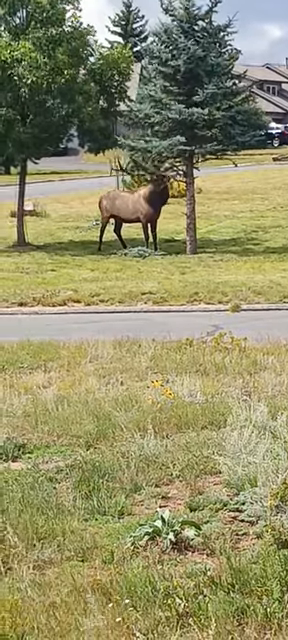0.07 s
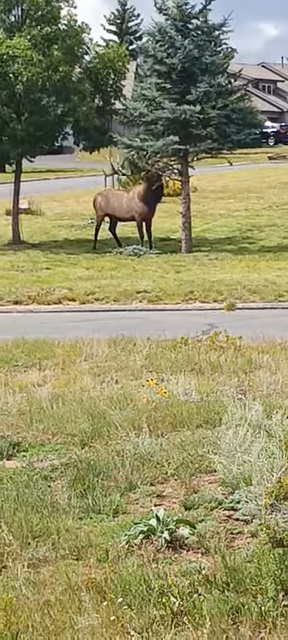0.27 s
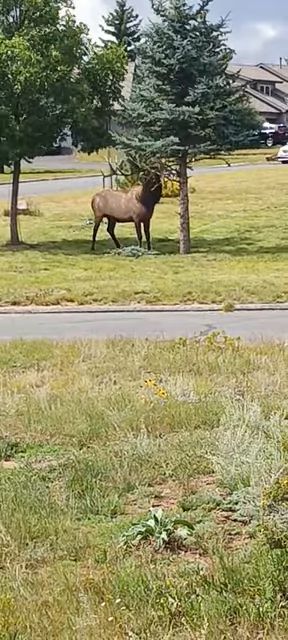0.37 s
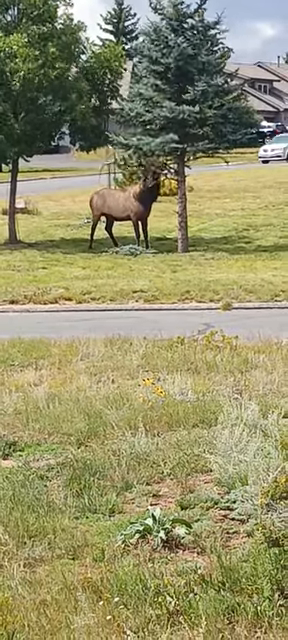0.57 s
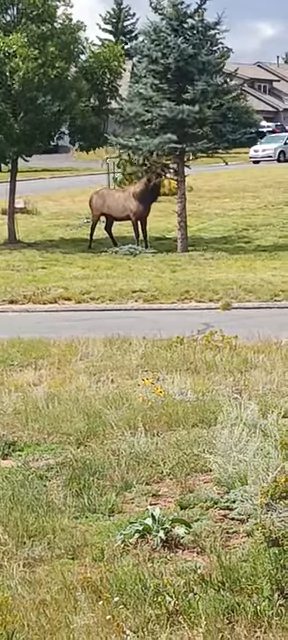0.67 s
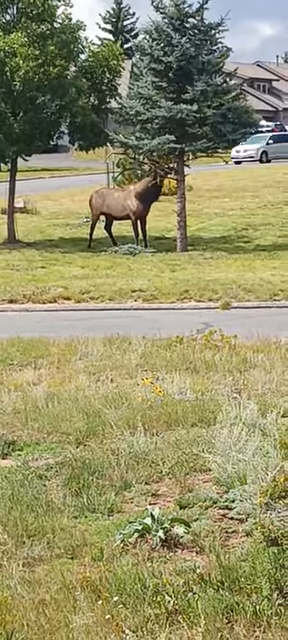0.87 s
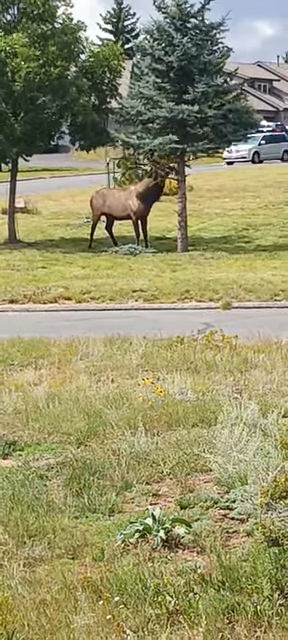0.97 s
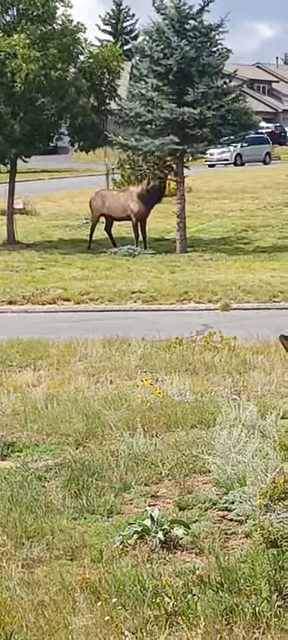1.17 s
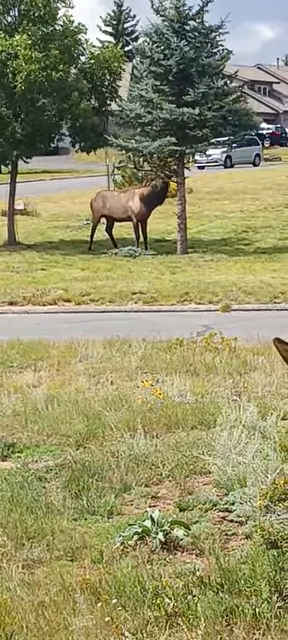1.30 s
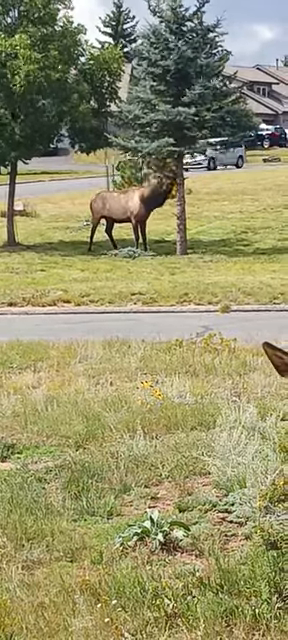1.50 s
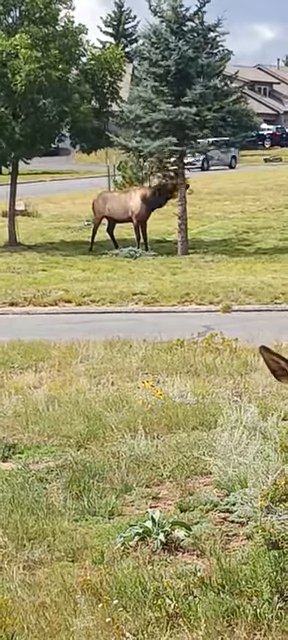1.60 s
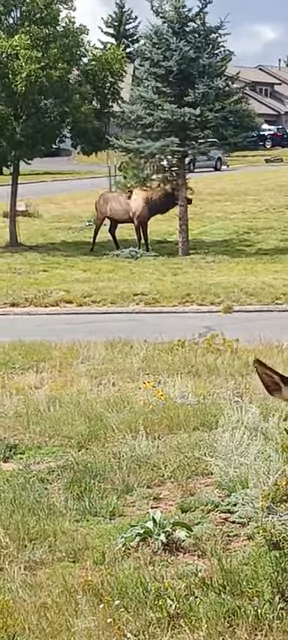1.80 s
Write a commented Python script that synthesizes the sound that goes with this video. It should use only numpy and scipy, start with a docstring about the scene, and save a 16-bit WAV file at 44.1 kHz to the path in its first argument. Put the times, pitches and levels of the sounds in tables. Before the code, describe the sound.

A songbird whistles thin high glides, then buzzes, trills and chatters outdoors over faint traffic rumble.

```python
"""A whistle sliding down from about 2.6 kHz comes first, soon joined by thin, high gliding whistles: a
songbird, probably a starling, left of the microphones. It sings near a road across an open lawn. Its two
voices, near sines on drawn pitch curves, slide through high and low whistles, break into a buzz and a trill,
and end in loose chatter. A ground bounce and noise-built echoes from trees and houses surround it; a fainter
song sounds farther off. Below lies shaped noise: the low rumble of distant traffic and a faint hiss."""
import sys
import numpy as np
from scipy import signal
from scipy.fft import rfft, irfft
from scipy.io import wavfile
from scipy.ndimage import uniform_filter1d, map_coordinates

SR = 44100
rng = np.random.default_rng(int(sys.argv[2]) if len(sys.argv) > 2 else 0)


def persist_wave(psi):
    """Save psi, clipped to +-1, as 16-bit WAV."""
    counts = np.round(np.clip(psi, -1, 1) * 32767).astype(np.int16)
    wavfile.write(sys.argv[1], SR, np.atleast_2d(counts).T)


N = 81585  # length in samples


def amp(db):
    """Amplitude factor of a level in dB."""
    return 10 ** (np.asarray(db) / 20)


def evened(x):
    """Scales a sound to an rms of one."""
    return x / np.sqrt(np.mean(x ** 2) + 1e-20)


def read(points, hz):
    """Reads a spectrum on a log-frequency axis."""
    f, value = np.transpose(points)
    return np.interp(np.log(hz + 1), np.log(f + 1), value)


def clock():
    """Time of every sample in seconds."""
    return np.arange(N) / SR


def drift(rate_hz):
    """Smooth chance movement, mostly slower than a rate."""
    hz = np.fft.rfftfreq(N, 1 / SR)
    spectrum = rfft(rng.standard_normal(N))
    return evened(irfft(spectrum / (1 + (hz / rate_hz) ** 4), N))


ATTACK_S, RELEASE_S = 0.0013, 0.002
WHISTLE_JITTER, CHIRP_JITTER = 0.0025, 0.011  # unsteadiness as a share of the pitch, doubled or halved in places


def voice(curve, jitter, bend_hz=0, overtone_db=-42, flutter_db=1):
    """One side of the syrinx: a near sine on a curve of pitch and level, slightly unsteady."""
    t = clock()
    s, hz, db = np.transpose(curve)
    attack = np.clip((t - s[0]) / ATTACK_S, 0, 1)
    release = np.clip((s[-1] - t) / RELEASE_S, 0, 1)
    pitch_hz = (np.interp(t, s, hz) + bend_hz) * (1 + jitter * drift(409))
    phase = 2 * np.pi * np.cumsum(pitch_hz) / SR
    level = attack * release * amp(np.interp(t, s, db) + flutter_db * drift(150))
    tone = np.sin(phase) + amp(overtone_db) * np.sin(2 * phase)
    return np.sqrt(2) * level * tone


# gliding whistles, one curve each: time_s, pitch_hz, level_db
LEAD_IN = [(0.01, 8870, -87), (0.04, 9000, -67.5), (0.076, 8760, -60), (0.116, 8180, -55.5),
           (0.15, 7940, -57.5), (0.19, 7500, -60)]
HIGH_WHISTLE = [(0.195, 8480, -69), (0.242, 8810, -51), (0.29, 8835, -45), (0.326, 8680, -41),
                (0.38, 8600, -43), (0.43, 8450, -41.5), (0.48, 8350, -43), (0.575, 8338, -39),
                (0.587, 8330, -56)]
SECOND_WHISTLE = [(0.19, 7800, -62), (0.21, 7780, -56), (0.254, 7710, -59), (0.29, 7690, -56),
                  (0.338, 7600, -58), (0.385, 7500, -61), (0.41, 7480, -72)]
ARCHED_WHISTLE = [(1.462, 6480, -73), (1.475, 7580, -56), (1.487, 8300, -52.5), (1.512, 8350, -52.5),
                  (1.535, 7910, -54.5), (1.56, 7360, -50), (1.579, 7240, -51), (1.59, 6200, -63)]
# faint combination tone of the two high whistles: time_s, pitch_hz, level_db
COMBINATION_TONE = [(0.205, 7200, -72), (0.245, 6620, -64.5), (0.35, 6680, -70.5)]
# brief breaks in the high whistle: time_s, half_width_s, depth_db
BREAKS = [(0.308, 0.0083, 7.5), (0.34, .005, 14.5), (0.379, 0.009, 12), (0.448, 0.01, 27),
          (0.496, 0.009, 24), (0.546, 0.012, 13)]
WHISTLE_WAVER_HZ = 9
SIDEBAND_HZ, SIDEBAND_DB, UPPER_SIDEBAND_DB = 3900, -23, -21
WHISTLE_HISS_DB = -27  # soft haze of hiss around the high whistle


def high_whistles():
    """Thin whistles; the main one breaks briefly, and all but its companions carry faint sidebands."""
    t = clock()
    dips_db = sum(depth * np.exp(-((t - s) / width) ** 2) for s, width, depth in BREAKS)
    main = voice(HIGH_WHISTLE, WHISTLE_JITTER, bend_hz=WHISTLE_WAVER_HZ * drift(68)) * amp(-dips_db)
    lead = voice(LEAD_IN, 2 * WHISTLE_JITTER, flutter_db=4.0)
    arch = voice(ARCHED_WHISTLE, CHIRP_JITTER)
    # turning the phase shifts every tone up or down by SIDEBAND_HZ
    turn = np.exp(2j * np.pi * SIDEBAND_HZ * t)
    shift = amp(UPPER_SIDEBAND_DB) * turn + amp(SIDEBAND_DB) / turn
    sidebands = (signal.hilbert(main + 0.5 * (lead + arch)) * shift).real
    second = voice(SECOND_WHISTLE, WHISTLE_JITTER, overtone_db=-13, flutter_db=1)
    combination = blurred(voice(COMBINATION_TONE, 2 * WHISTLE_JITTER))
    return main + lead + arch + sidebands + second + combination + amp(WHISTLE_HISS_DB) * hiss(main)


# the buzz, a lead note then two close voices: time_s, pitch_hz, level_db
BUZZ = [
    [(0.646, 4530, -41), (0.652, 4420, -34.5), (0.658, 4330, -38), (0.665, 4300, -42)],
    [(0.669, 4320, -42), (0.676, 4320, -36), (0.69, 4340, -39), (0.701, 4290, -35.5), (0.705, 4280, -45),
     (0.722, 4150, -47)],
    [(0.669, 3900, -44), (0.676, 3900, -39), (0.695, 3830, -42), (0.701, 3750, -47), (0.712, 3650, -44),
     (0.728, 3300, -49)],
]
BUZZ_SWING_HZ, BUZZ_RATE_HZ = 110, 370


def buzz():
    """A lead note, then two close voices whose pitch trembles together."""
    tremble = BUZZ_SWING_HZ * np.sin(2 * np.pi * BUZZ_RATE_HZ * clock())
    lead = voice(BUZZ[0], CHIRP_JITTER / 2)
    return lead + sum(voice(curve, 2 * CHIRP_JITTER, tremble) for curve in BUZZ[1:])


PIP_FADE_DB = 0.5  # level change over the second half; positive is louder


def pip(start, length, db, hz, fall_hz):
    """A short plain note whose pitch slides straight, mostly downward."""
    curve = [
        (start, hz + fall_hz / 2, db),
        (start + length / 2, hz, db),
        (start + length, hz - fall_hz / 2, db + PIP_FADE_DB)]
    return voice(curve, jitter=0.0052, overtone_db=-41.5, flutter_db=1)


CHIRR_RISE_HZ_PER_S, CHIRR_SWING_HZ, CHIRR_RATE_HZ = 19000, 160, 230
LOWER_SHARE, LOWER_FADE_DB = 0.6, -4  # the lower voice's share of the length, and its level change
UPPER_HZ, UPPER_SAG_HZ, UPPER_LAG_S = 4540, 170, 0.0024
UPPER_DB = (-14, -4.5, -11)  # start, middle and end, relative to the note


def chirr(start, length, db, hz):
    """The lower voice wobbles upward against an upper voice that joins late and outlasts it."""
    span = length * LOWER_SHARE
    wobble = -CHIRR_SWING_HZ * np.sin(2 * np.pi * CHIRR_RATE_HZ * (clock() - start))
    lower = [(start, hz, db), (start + span, hz + CHIRR_RISE_HZ_PER_S * span, db + LOWER_FADE_DB)]
    upper = [(start + UPPER_LAG_S + u * length, UPPER_HZ - u * UPPER_SAG_HZ, db + relative_db)
             for u, relative_db in zip((0, 0.5, 1), UPPER_DB)]
    return voice(lower, 2 * CHIRP_JITTER, wobble) + voice(upper, CHIRP_JITTER)


CHATTER_FADE_DB = -1.5  # level change by the end of a note


def chirp(start, length, db, *pitches):
    """A quick note that swings smoothly through its pitches."""
    u = np.linspace(0, 1, 20)
    place = u * (len(pitches) - 1)
    hz = map_coordinates(np.array(pitches, float), [place], order=3, mode="nearest")
    curve = np.transpose([start + u * length, hz, db + CHATTER_FADE_DB * u ** 2])
    return voice(curve, CHIRP_JITTER)


# plain notes of the trill: start_s, length_s, level_db, pitch_hz, fall_hz
PIPS = [(0.7302, 0.012, -34.8, 3760, 160), (0.7775, 0.013, -34.2, 3670, -90),
        (0.8288, 0.0108, -33.3, 3680, 90), (0.932, 0.0095, -32.3, 3640, 169),
        (1.0415, 0.0088, -32.8, 3660, 250), (1.1553, 0.0084, -35, 3620, 130)]
# two-voiced notes of the trill: start_s, length_s, level_db, lower_pitch_hz
CHIRRS = [(0.788, 0.02, -41.5, 3700), (0.8818, 0.026, -35, 3760), (0.9865, 0.026, -34, 3800),
          (1.0955, 0.026, -33, 3860), (1.212, 0.025, -35.5, 3850)]
# chatter: start_s, length_s, level_db, then five pitch_hz evenly spread through the note
CHATTER = [ (0.806, 0.0094, -53.5, 2700, 2700, 2500, 2260, 2050),
           (0.819, 0.0078, -53, 2664, 2680, 2400, 2300, 1970),
           (0.913, 0.014, -55, 2400, 2770, 2940, 2520, 2250),
           (0.962, 0.016, -55, 2400, 2620, 2740, 2660, 2260),
           (1.3196, 0.0065, -40.5, 3890, 3800, 3750, 3550, 3400),
           (1.331, 0.016, -52.5, 2775, 2260, 2196, 2270, 2230),
           (1.365, 0.0068, -50.5, 2876, 2740, 2470, 2280, 2100),
           (1.39, 0.018, -35, 3550, 3920, 3820, 3490, 4080),
           (1.412, 0.022, -58.5, 6460, 5240, 5480, 4870, 4830),
           (1.436, 0.0193, -43.5, 3210, 2970, 2940, 2774, 2650),
           (1.4706, 0.0098, -37.5, 4120, 4300, 4820, 4290, 4070),
           (1.4747, 0.009, -33, 4200, 3940, 3780, 3990, 3460),
           (1.531, 0.00524, -43, 3017, 3420, 4170, 5180, 6050),
           (1.537, .014, -36, 4100, 3586, 4010, 3190, 2930),
           (1.551, 0.0094, -38.5, 2937, 2774, 2826, 2990, 3080),
           (1.580, 0.0112, -46, 2904, 2700, 2675, 2620, 2170),
           (1.6137, 0.0161, -37.5, 3874, 3800, 4335, 3583, 4200),
           (1.678, 0.0103, -42.5, 4400, 4650, 4730, 4250, 3800),
           (1.687, 0.0094, -46.5, 3810, 3460, 3820, 3400, 2760),
           (1.726, 0.01, -48.5, 2930, 2690, 2720, 2950, 3050),
           (1.755, 0.0067, -51, 3340, 3680, 3970, 4680, 4960),
           (1.836, 0.016, -54.5, 3700, 4720, 4350, 3350, 3130)]


def song():
    """The buzz, a trill of plain and two-voiced notes, and chatter."""
    trill = sum(pip(*row) for row in PIPS) + sum(chirr(*row) for row in CHIRRS)
    return buzz() + trill + sum(chirp(*row) for row in CHATTER)


GRIT_DB, GRIT_KNEE_DB = -26, -21  # strength, and the level where it sets in
NOTE_HISS_DB = -25.5  # relative to the note


def roughened(x):
    """Loud notes gain combination tones, a third harmonic and a hiss that follows them."""
    power = abs(uniform_filter1d(x ** 2, size=300))
    cubic = x * (x ** 2 - 1.5 * power)
    grit = amp(GRIT_DB) * cubic / (power + amp(GRIT_KNEE_DB) ** 2)
    return x - grit + amp(NOTE_HISS_DB) * hiss(x)


# color of the hiss, relative: frequency_hz, level_db per Hz
HISS_COLOR = [(1200, -2), (2400, 4), (3500, 4), (5100, 12.5), (6200, 1.5), (9000, -6.5), (15500, -4.5)]


def hiss(x):
    """Hiss that follows the loudness of a voice."""
    level = np.sqrt(abs(uniform_filter1d(x ** 2, size=300)))
    color = amp(read(HISS_COLOR, np.fft.rfftfreq(N, 1 / SR)))
    return level * evened(irfft(rfft(rng.standard_normal(N)) * color, N))


# pure slides of the lower voice: time_s, pitch_hz, level_db
LOW_WHISTLES = [
    [(0, 2576, -59), (0.015, 2269, -57), (0.028, 1950, -52.5), (0.05, 1808, -51), (0.08, 1757, -74),
     (0.33, 1794, -64.5), (0.42, 1800, -71)],
    [(0.2, 3210, -69), (0.215, 3180, -53.5), (0.246, 3138, -45.5), (0.258, 3120, -64)],
    [(0.205, 2866, -66), (0.245, 2630, -53), (0.28, 2593, -50.5), (0.325, 2684, -45), (0.358, 2740, -47),
     (0.375, 2545, -43.5), (0.398, 2230, -46), (0.434, 2036, -48), (0.485, 2018, -46), (0.56, 2027, -57),
     (0.59, 2002, -67), (0.7, 2050, -60.5)],
]
# a faint echo of the 2.7 kHz slide, lingering with a strong overtone: time_s, pitch_hz, level_db
SLIDE_ECHO = [(0.3, 2690, -56.5), (0.38, 2710, -60), (0.6, 2700, -71)]
# a soft warble falling out of the buzz: time_s, pitch_hz, level_db before its pulse
WARBLE = [(0.724, 3300, -53), (0.738, 3100, -51), (0.754, 2780, -49.5), (0.766, 2400, -54),
          (0.79, 2400, -54)]
WARBLE_HZ, WARBLE_CREST_S = 60, 0.7375  # rate, and the time of one pitch crest
WARBLE_SWING_HZ, WARBLE_PULSE = 450, 0.45


def low_whistles():
    """Slides of the lower voice, a lingering echo, and a warble loudest on each fall of its pitch swing."""
    cycle = 2 * np.pi * WARBLE_HZ * (clock() - WARBLE_CREST_S)
    slides = sum(voice(curve, 2 * WHISTLE_JITTER, overtone_db=-42) for curve in LOW_WHISTLES)
    slide_echo = voice(SLIDE_ECHO, 2 * WHISTLE_JITTER, overtone_db=-11.5)
    warble = voice(WARBLE, 2 * CHIRP_JITTER, WARBLE_SWING_HZ * np.cos(cycle), flutter_db=4)
    pulse = (1 + WARBLE_PULSE * np.sin(cycle)) / (1 + WARBLE_PULSE / 2)
    return slides + slide_echo + warble * pulse


# faint whistles from farther off: time_s, pitch_hz, level_db before FAR_DIRECT_DB
FAR_WHISTLES = [
    [(0.918, 2100, -59), (0.94, 2380, -58), (0.985, 2050, -63), (1.03, 2220, -61)],
    [(1.05, 2430, -62), (1.105, 2300, -59), (1.15, 2494, -60), (1.2, 2450, -72), (1.25, 2333, -62),
     (1.3, 2200, -64)],
]
# a distant rattle behind the trill: time_s, pitch_hz, level_db before FAR_DIRECT_DB
RATTLE = [(0.8, 2388, -58.5), (0.93, 2346, -58)]
RATTLE_SWING_HZ, RATTLE_RATE_HZ = 400, 75


def distant_song():
    """Wavering whistles and a quick, smeared rattle from farther off."""
    swing = RATTLE_SWING_HZ * np.sin(2 * np.pi * RATTLE_RATE_HZ * clock() + drift(19.2))
    whistles = sum(voice(curve, WHISTLE_JITTER, flutter_db=2.5) for curve in FAR_WHISTLES)
    rattle = voice(RATTLE, 2 * CHIRP_JITTER, swing, flutter_db=3.5)
    return whistles + blurred(blurred(rattle))


def left_right(pan_db):
    """Gains of the two microphones, the left one louder by pan_db."""
    return amp([[pan_db / 2], [-pan_db / 2]])


def placed(x, pan_db):
    """The bird sits to the left and is louder there."""
    gains = left_right(pan_db)
    return x * gains / gains.mean()


GROUND_DB, GROUND_DELAY_S = -12, 0.0068


def ground_bounce(x):
    """One weaker, later copy of the notes off the ground."""
    return amp(GROUND_DB) * np.pad(x, (round(GROUND_DELAY_S * SR), 0))[:N]


NEAR_DB, NEAR_DECAY_S, NEAR_DELAY_S = -8.5, 0.013, 0.0045


def near_echo(x, pan_db):
    """Quick scatter from the ground and surfaces close by: a short burst of decaying noise taps."""
    t = np.arange(SR // 10) / SR
    onset = np.clip((t - NEAR_DELAY_S) / ATTACK_S, 0, 1)
    taps = rng.standard_normal((2, len(t))) * np.exp(-t / NEAR_DECAY_S) * onset
    taps *= amp(NEAR_DB) / np.linalg.norm(taps, axis=1, keepdims=True)
    return signal.fftconvolve(x[None], taps, axes=1)[:, :N] * left_right(pan_db)


BLUR_RADIANS, BLUR_RATE_HZ = 1.27, 142  # in the far echo, moving leaves smear the pitch


def blurred(x):
    """A wandering phase spreads clean tones into narrow noise."""
    return (signal.hilbert(x) * np.exp(1j * BLUR_RADIANS * drift(BLUR_RATE_HZ))).real


# time to fade by 60 dB: frequency_hz, fade_s
ECHO_T60 = [(1500, .75), (4000, .6), (8000, .42), (15000, .3)]
# strength of the echo: frequency_hz, level_db
ECHO_DB = [(1500, -1.5), (2500, -6.5), (4000, -5.5), (8000, -3.5), (15000, -8)]


def far_echo(x, pan_db):
    """Diffuse return from trees and houses; the treble dies first."""
    hz, t, noise = signal.stft(rng.standard_normal((2, SR)), SR, nperseg=256)
    fade = amp(-60 * t / read(ECHO_T60, hz)[:, None])
    strength = amp(read(ECHO_DB, hz))[:, None]
    fade *= strength / np.sqrt(SR * np.mean(fade ** 2, axis=1, keepdims=True))
    tail = signal.istft(noise * fade, SR, nperseg=256)[1][:, :SR // 2]
    tail *= np.minimum(np.arange(tail.shape[1]) / SR / 0.0098, 1)  # swells in over 9.8 ms
    return signal.fftconvolve(x[None], tail, axes=1)[:, :N] * left_right(pan_db)


# color of traffic and hiss, relative: frequency_hz, level_db per Hz
AIR = [(20, -25), (40, -5.5), (70, 0), (130, -2.5), (250, -7), (420, -12.5), (750, -24.5), (1300, -17),
       (2000, -18.5), (3200, -27), (5500, -32.5), (8000, -33), (11000, -36), (15500, -37)]
# likeness of the two microphones: frequency_hz, correlation
AIR_SAME = [(30, 0.44), (80, 0.74), (180, 0.21), (400, 0.14), (1500, 0.16), (6000, 0.99), (15000, 0.66)]
AIR_DB = -55


def air():
    """Distant traffic rumble and a faint even hiss: shaped noise, partly shared by left and right."""
    hz = np.fft.rfftfreq(N, 1 / SR)
    a, b = rfft(rng.standard_normal((2, N)))
    same = np.clip(read(AIR_SAME, hz), -1, 1)
    both = np.array([a, same * a + np.sqrt(1 - same ** 2) * b]) * amp(read(AIR, hz))
    return amp(AIR_DB) * evened(irfft(both, N))


BIRD_PAN_DB, LOW_PAN_DB, HIGH_PAN_DB = 4.9, 6.3, 4
WHISTLE_ECHO_DB, ARCH_ECHO_DB, FAR_DIRECT_DB = -4.5, -2, -3


def scene():
    """The song, its bounce off the ground, its echoes and the background."""
    high, low, notes, distant = high_whistles(), low_whistles(), roughened(song()), distant_song()
    direct = placed(high, HIGH_PAN_DB)
    direct = direct + placed(low + amp(FAR_DIRECT_DB) * distant, LOW_PAN_DB)
    direct = direct + placed(notes + ground_bounce(notes), BIRD_PAN_DB)
    near = near_echo(notes + 0.5 * (low + 0.5 * high), pan_db=5)
    # the arched whistle feeds the far echo once more on its own
    extra_arch = amp(ARCH_ECHO_DB) * voice(ARCHED_WHISTLE, 2 * CHIRP_JITTER)
    thrown = amp(WHISTLE_ECHO_DB) * high + extra_arch
    far = far_echo(blurred(thrown + low + notes) + distant, pan_db=1.2)
    return direct + near + far + air()


EDGE_HZ = 15600


def record(dry):
    """The band limit of the recorder: a steep low-pass."""
    low_pass = signal.firwin(511, EDGE_HZ, window=("kaiser", 9), fs=SR)
    return signal.oaconvolve(dry, low_pass[None], "same")


dry = scene()
out = record(dry)
persist_wave(out)
```